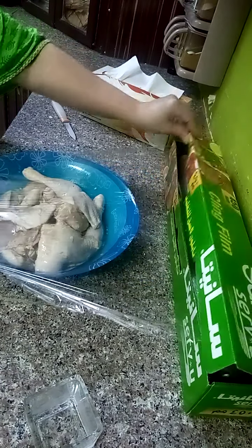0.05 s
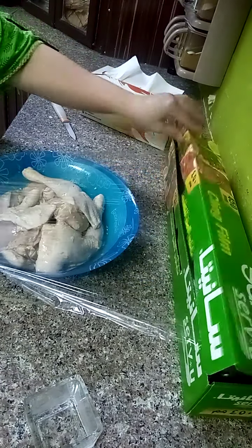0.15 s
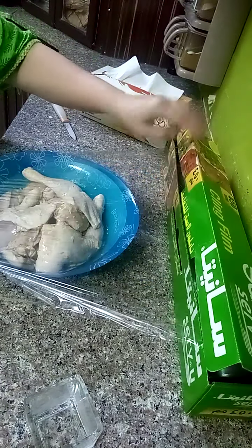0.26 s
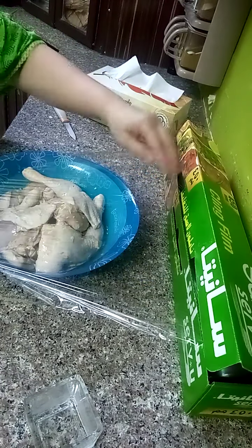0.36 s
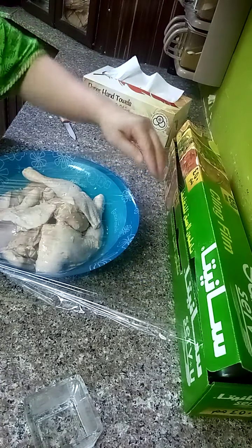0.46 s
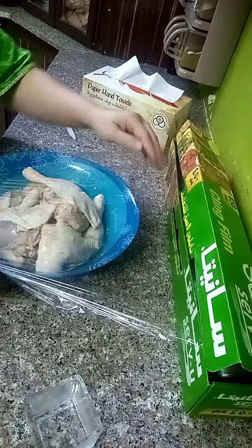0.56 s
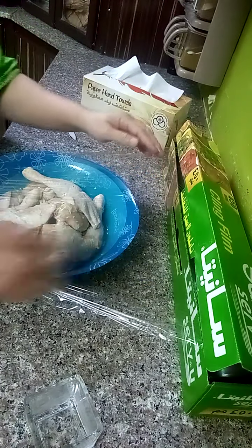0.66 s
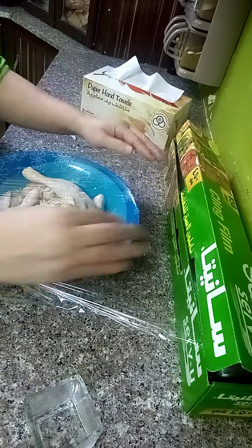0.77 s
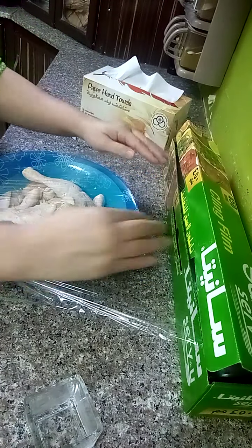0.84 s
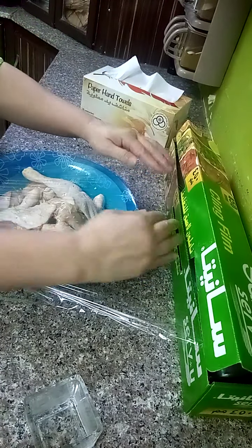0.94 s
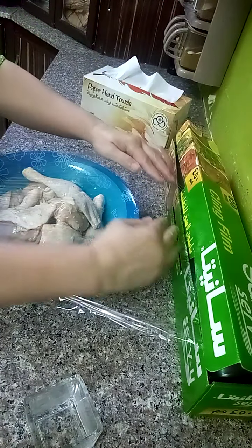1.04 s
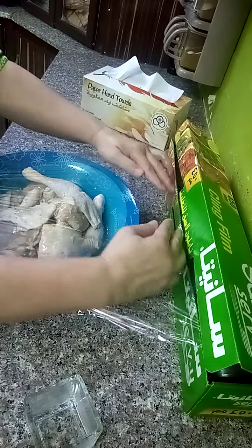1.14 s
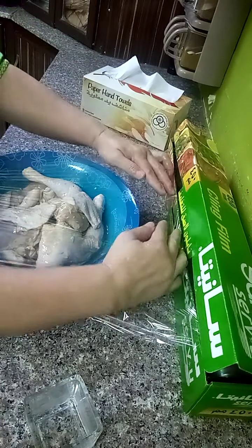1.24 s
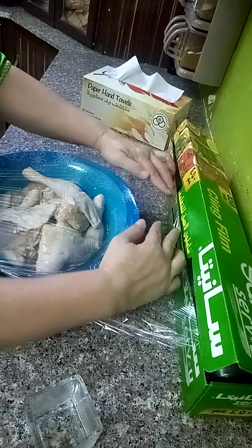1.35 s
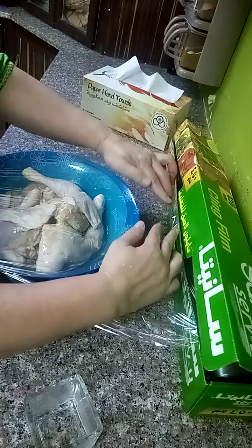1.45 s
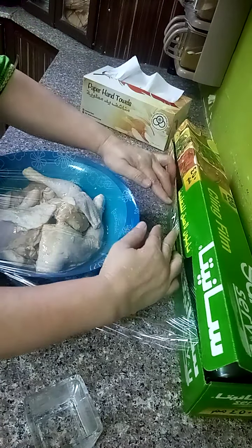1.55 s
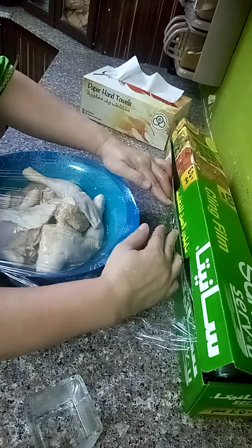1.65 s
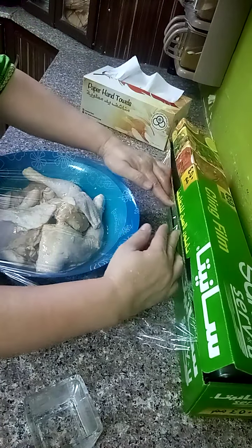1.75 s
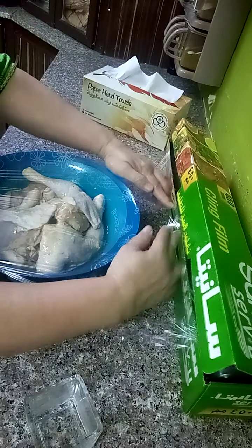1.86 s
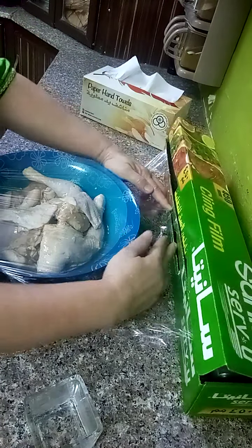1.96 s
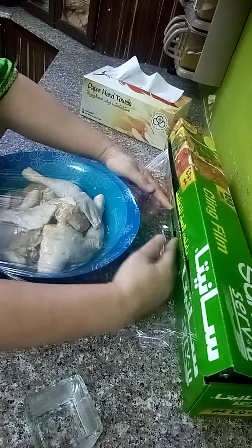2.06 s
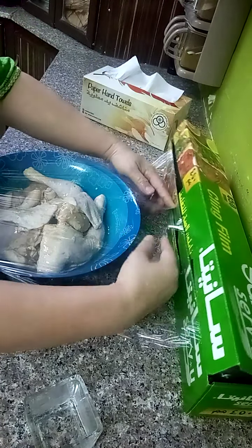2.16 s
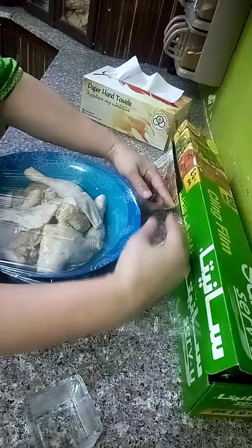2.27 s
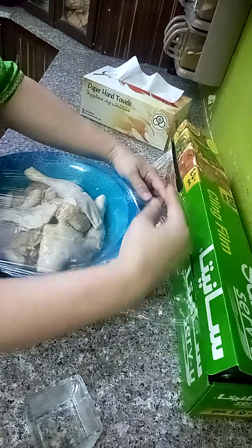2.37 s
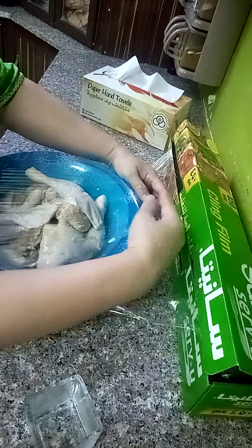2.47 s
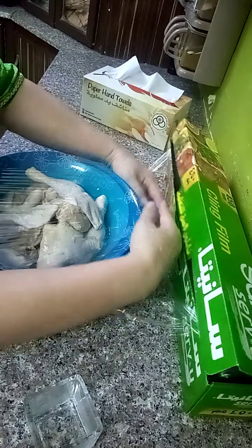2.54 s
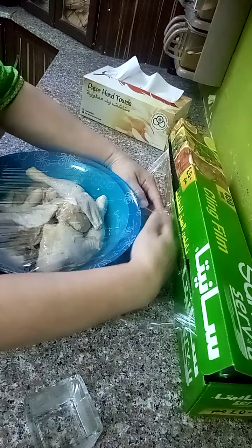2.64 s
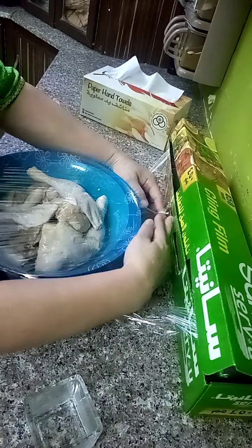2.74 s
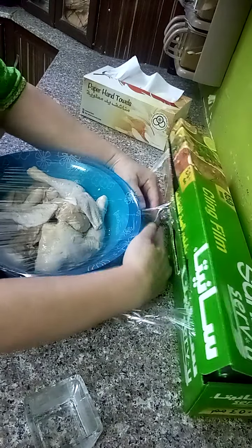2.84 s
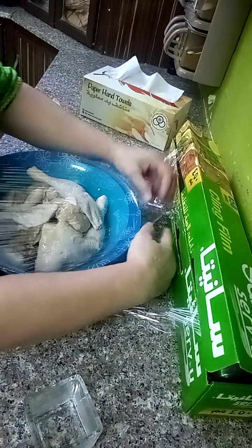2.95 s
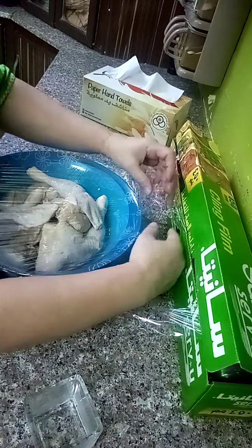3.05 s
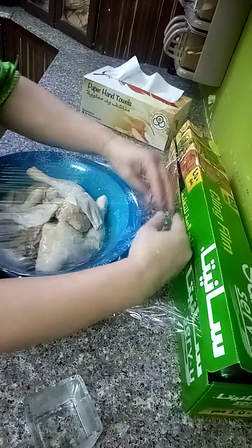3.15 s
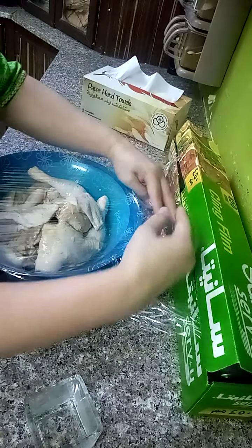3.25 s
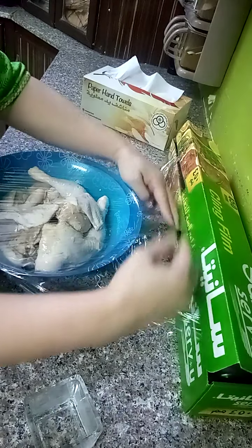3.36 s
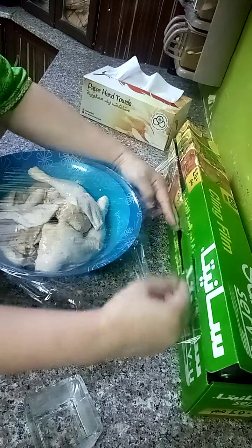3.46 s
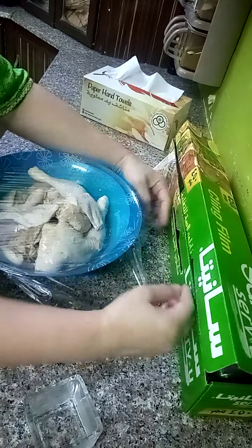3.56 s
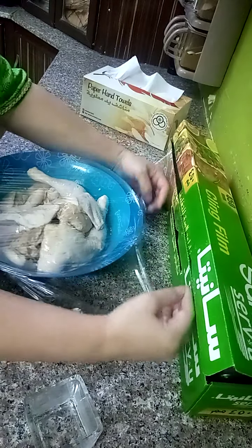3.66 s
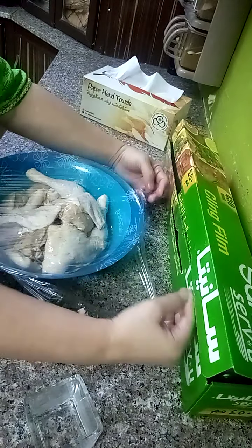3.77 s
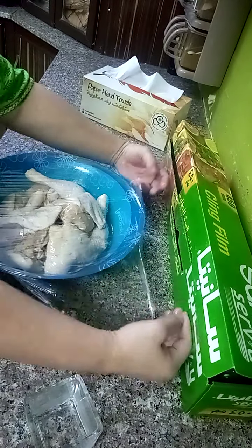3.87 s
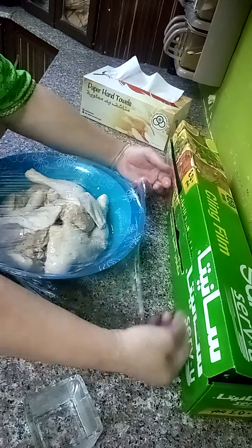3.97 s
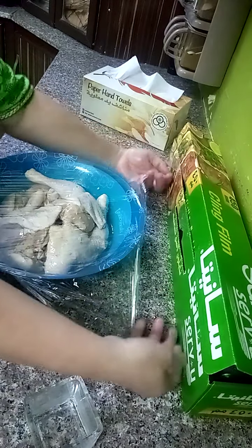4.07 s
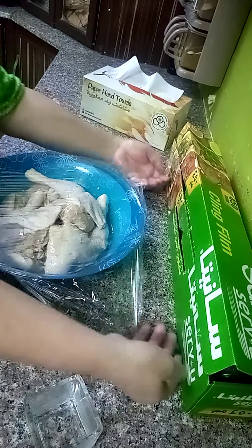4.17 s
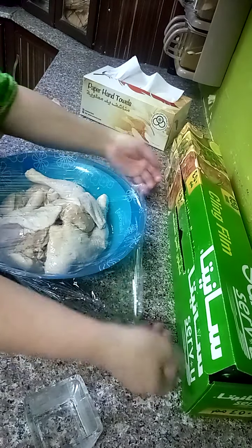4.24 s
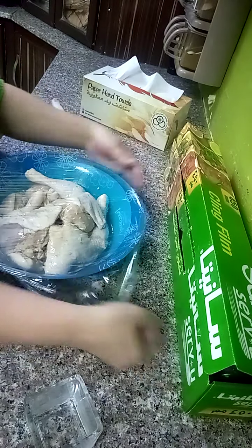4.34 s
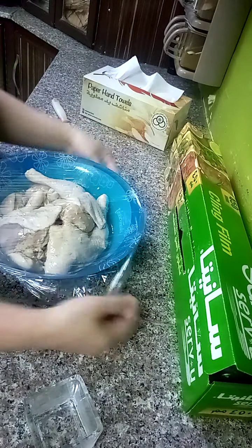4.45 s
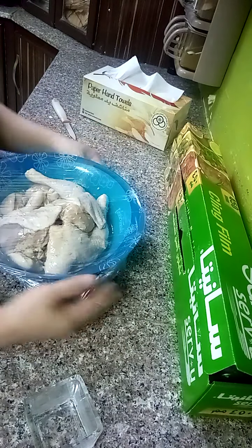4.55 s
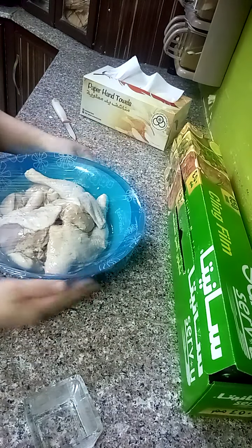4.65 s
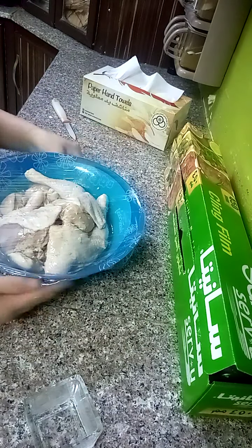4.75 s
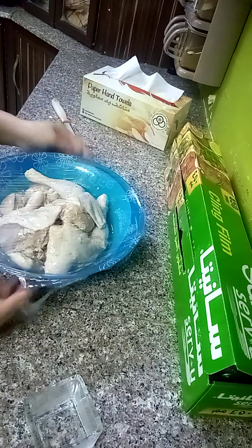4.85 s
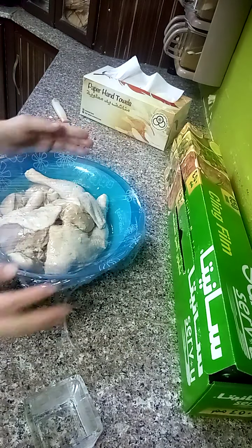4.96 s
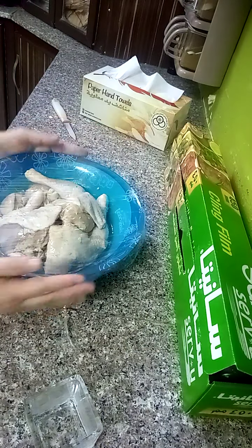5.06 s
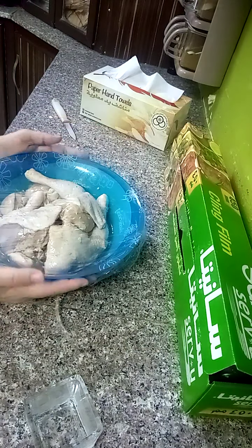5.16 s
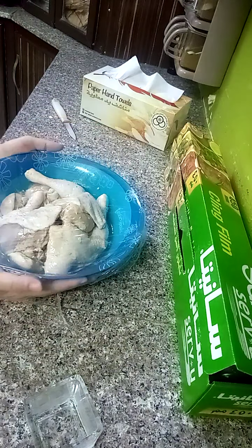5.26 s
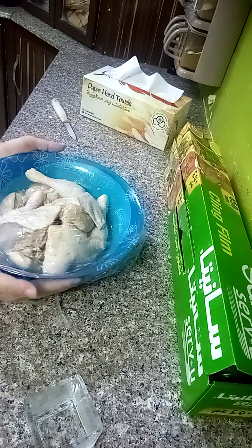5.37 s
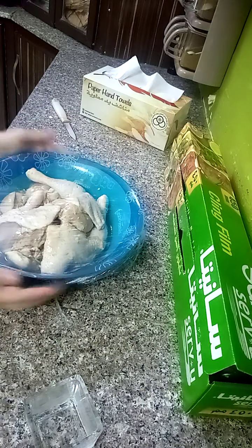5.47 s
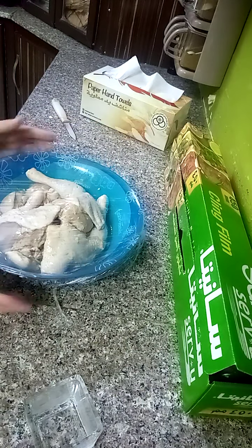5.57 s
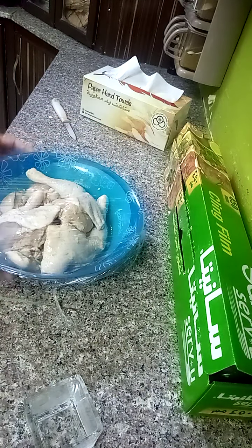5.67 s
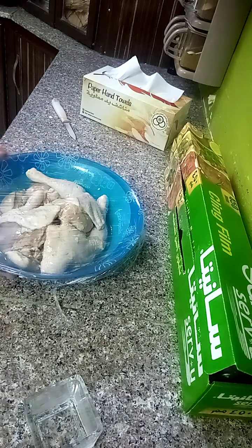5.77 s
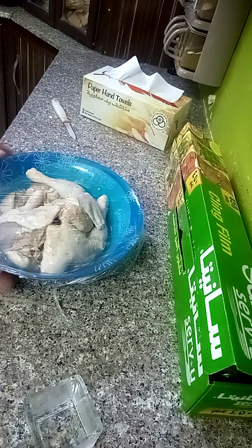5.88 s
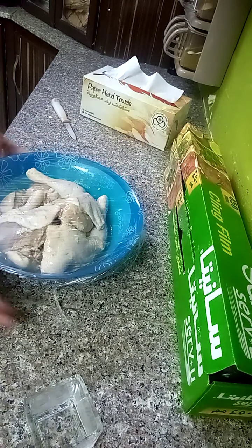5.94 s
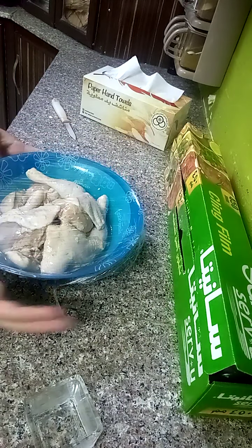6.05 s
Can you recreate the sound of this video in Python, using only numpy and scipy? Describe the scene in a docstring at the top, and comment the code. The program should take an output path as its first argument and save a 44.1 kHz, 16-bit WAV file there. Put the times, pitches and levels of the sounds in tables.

```python
"""A kitchen counter: cling film is pulled from its box, stretched over a plastic bowl and pressed down.
Loose film crinkles in countless tiny clicks; taut film drums as coloured noise and clicks, squeaks in
gliding harmonics and peels off in quick slips that ring like a plucked sheet. Hands bump the bowl and box
in low, decaying tones. Scattered echoes and a ringing tail make the hard kitchen; shaped noise and
sines make its air and faint appliance hum, all picked up by a phone's two microphones."""
import sys
import numpy as np
from scipy import signal
from scipy.fft import rfft, irfft, next_fast_len
from scipy.io import wavfile
from scipy.ndimage import uniform_filter1d, map_coordinates

SR = 44100
rng = np.random.default_rng(int(sys.argv[2]) if len(sys.argv) > 2 else 0)


def log_audio(samples):
    """Write samples as a 16-bit WAV file to the path given in sys.argv[1]."""
    # one column per channel
    frames = np.atleast_2d(samples).T
    # limit to full scale, then quantise
    limited = np.clip(frames, -1, 1)
    pcm = np.round(limited * 32767).astype(np.int16)
    wavfile.write(sys.argv[1], SR, pcm)


N = 269451  # length in samples
TOP_HZ = 15700  # upper edge of the band


def amp(db):
    """Decibels to gain."""
    return 10 ** (np.asarray(db) / 20)


def unit(x):
    """Scale to rms 1."""
    return x / np.sqrt(np.mean(x ** 2) + 1e-20)


def along(points, hz):
    """Read (f/Hz, value) points on a log frequency axis."""
    f, v = np.transpose(points)
    return np.interp(np.log(hz + 1), np.log(f + 1), v)


def seconds(length):
    """A time axis of the given length in seconds."""
    return np.arange(int(length * SR)) / SR


def add(track, s, sound):
    """Mix a sound into a track at time s."""
    part = track[max(round(s * SR), 0):][:len(sound)]
    part += sound[:len(part)]


def wobble(rate, size=N):
    """A random curve of straight segments, rate knots a second."""
    knots = rng.standard_normal(size // 8 + 4)
    return map_coordinates(knots, [np.arange(size) * rate / SR], order=1)


def filtered(x, response):
    """Multiply the spectrum of x by a response of frequency."""
    n = x.shape[-1]
    m = next_fast_len(n + 8192)
    hz = np.fft.rfftfreq(m, 1 / SR)
    return irfft(rfft(x, m) * response(hz), m)[..., :n]


def coloured(x, spectrum):
    """Shape x with a spectrum, at rms 1."""
    return unit(filtered(x, lambda hz: amp(along(spectrum, hz))))


def buckles(spectrum, rate, spread_db, clump_db, facet_db):
    """Tiny clicks of uneven size that come in clumps; each patch of film favours its own pitches."""
    happens = rng.random(N) < rate / SR
    sign = rng.choice([-1, 1], N)
    size = amp(spread_db * np.clip(rng.standard_normal(N), -2, 2))
    clicks = happens * sign * size * amp(clump_db * wobble(170))
    z = signal.stft(clicks, nperseg=128)[2]
    # random gains, smoothed over pitch and then over time
    facets = uniform_filter1d(rng.standard_normal(z.shape), 3, 0)
    facets = unit(uniform_filter1d(facets, 8, 1))
    return coloured(signal.istft(z * amp(facet_db * facets), nperseg=128)[1][:N], spectrum)


# colour of loose film: f/Hz, relative level/dB
CRINKLE = [(100, -90), (600, -1.5), (1500, -3.5), (2500, -1), (4000, 1.5), (6000, 4), (9000, 1.5),
           (11500, -10), (16000, -17)]
# colour of taut film drumming: f/Hz, relative level/dB
TAUT = [(40, -35), (120, -0.5), (200, -2.5), (370, 4), (640, 3.5), (1000, -3), (1400, -4.5), (2000, -8),
        (2800, -2.5), (6000, -47), (12000, -66)]
# tugs that stretch the film over the bowl:
# start t/s, length t/s, relative crinkle level/dB, relative drumming level/dB, crinkle tilt/(dB per octave)
TUGS = [(0, 0.039, -47.5, -48.5, -6), (0.993, 0.037, -57, -49, 0), (1.019, 0.086, -39, -45, -5),
        (1.198, 0.22, -41.5, -47, 6.5), (1.355, 0.043, -45, -44.5, -17), (1.492, 0.025, -45.5, -49, 1),
        (1.629, 0.05, -32, -36, -4.5), (1.728, .094, -33.5, -33, 0), (1.927, 0.024, -41.5, -46.5, -2),
        (2.062, .06, -47, -61, -1.5), (2.259, 0.047, -39, -49.5, 3.5), (2.398, .06, -37, -41.5, 2),
        (2.499, 0.08, -36.5, -33, 1), (2.651, 0.098, -35.5, -35.5, -5.5), (2.957, 0.031, -49, -44.5, 1.5),
        (3.035, 0.046, -35.5, -43, -3), (3.153, 0.038, -33.5, -38.5, -1), (3.218, 0.081, -53, -36.5, -1),
        (3.329, 0.027, -35, -44, 4.5), (3.414, 0.067, -33, -38.5, -0.5), (3.547, 0.076, -44.5, -37, 5),
        (3.678, 0.08, -38.5, -35.5, -0.5), (3.883, 0.054, -34, -26, -4.5)]
# palms smoothing the slack film round the rim: start t/s, length t/s, relative crinkle level/dB
RUBS = [(0.239, 0.077, -57.5), (4.35, 0.027, -36.5), (4.505, 0.13, -35), (4.961, .032, -39),
        (5.075, 0.074, -39.5), (5.3, 0.043, -52.5), (5.533, 0.16, -45.5), (5.764, 0.028, -51),
        (6.051, 0.094, -47.5)]
# folded under the rim, the film drums less and crinkles brighter:
# t/s, drumming relative to crinkle level/dB, crinkle tilt/(dB per octave)
SLACK = [(4.55, -11.5, 0.5), (4.95, -24, 3.5)]


def strokes(level_db=-0.85, tug_hz=1295, rub_hz=2100):
    """Moving film buckles all over; where it is taut, the buckles drum on the sheet."""
    loose = buckles(CRINKLE, rate=2200, spread_db=4.5, clump_db=3.0, facet_db=-1.0)
    taut = buckles(TAUT, rate=2500, spread_db=3, clump_db=2, facet_db=2.5)
    out = np.zeros(N)
    # tugs drum on a wide taut sheet
    for s, length, crinkle_db, drum_db, tilt_db in TUGS:
        add(out, s, stroke(loose, taut, s, length, crinkle_db, drum_db, tilt_db, tug_hz))
    # rubs drum higher, on a narrow strip at the rim
    times, drumming, tilts = np.transpose(SLACK)
    for s, length, db in RUBS:
        drum_db = db + np.interp(s, times, drumming)
        tilt_db = np.interp(s, times, tilts)
        add(out, s, stroke(loose, taut, s, length, db, drum_db, tilt_db, rub_hz))
    return amp(level_db) * out


def stroke(loose, taut, s, length, crinkle_db, drum_db, tilt_db, drum_hz,
           width_octaves=1.06, focus_db=10, knee_hz=1500,
           attack_share=0.12, release_s=.012, settle_db=-9.5, settle_s=0.051):
    """One move of the hand: attack, hold, release and settling shape both the crinkle and the drumming."""
    def tilt(hz):
        return amp(tilt_db * np.log2(np.maximum(hz, knee_hz) / knee_hz))

    def focus(hz):
        octaves = np.log2((hz + 1) / drum_hz)
        return amp(focus_db * np.exp(-.5 * (octaves / width_octaves) ** 2))

    span = slice(max(round(s * SR), 0), round((s + length + .25) * SR))
    crinkle = unit(filtered(loose[span], tilt))
    drum = unit(filtered(taut[span], focus))
    t = np.arange(len(drum)) / SR
    after = np.maximum(t - length, 0)
    attack = (1 - np.exp(-t / (attack_share * length))) ** 2
    release = np.exp(-after / release_s)
    settling = amp(settle_db) * np.exp(-after / settle_s)  # the film goes on creeping for a moment
    motion = attack * np.maximum(release, settling)
    return motion * (amp(crinkle_db) * crinkle + amp(drum_db) * drum)


# creases snapping through: t/s, relative crackle level/dB, drumming relative to first level column/dB
SNAPS = [(.078, -30.5, -22), (0.9832, -35.5, 7.5), (1.176, -23.5, 7), (1.2277, -22, 1), (1.285, -32, -18),
         (1.323, -8, -5.5), (1.3659, -8.5, -35), (1.4656, -22, -25), (1.599, -26.5, -4),
         (1.9482, -19.5, -22), (2.016, -26, 4), (2.3405, -30, -6), (2.3847, -22.5, -6), (2.44, -10.5, -4),
         (2.4997, -15.5, -0.5), (2.5482, -9, -13), (2.7183, -6, -9), (3.1748, -11.5, 0), (3.279, -8.5, -14),
         (3.354, -19, -10), (3.5457, -12.5, -12), (3.6062, -18, -3), (3.7504, -16, -9),
         (3.9307, -11.5, -15), (4.437, -19.5, -1.5), (4.7863, -31.5, -2), (4.9773, -30, -25)]


def snaps(t60=0.019, rise=.003):
    """A crease gives way in a short avalanche of buckles."""
    t = seconds(0.026)
    burst = (1 - np.exp(-t / rise)) ** 2 * amp(-60 * t / t60)
    crackle = buckles(CRINKLE, rate=6000, spread_db=3, clump_db=0, facet_db=2.5)
    drum = coloured(rng.standard_normal(N), TAUT)
    out = np.zeros(N)
    for s, db, drum_db in SNAPS:
        span = slice(round(s * SR), round(s * SR) + len(t))
        crack = amp(db - 23.0) * unit(burst * crackle[span])
        thump = amp(db + drum_db - 30.0) * unit(burst * drum[span])
        add(out, s - rise, crack + thump)
    return out


# film peeling in slips: start t/s, length t/s, first slip rate/(1/s), central ring f/Hz,
# relative ring level/dB, relative crack level/dB, swell over the peel/dB
PEELS = [(1.033, 0.082, 242, 1380, -38, -39, 3), (1.614, 0.059, 119, 1170, -37, -21.5, -2),
         (1.731, 0.061, 68, 1160, -22, -23.5, -7.5), (2.664, 0.055, 160, 1140, -33, -28.5, 4),
         (3.422, .016, 160, 983, -22.5, -51, -6), (3.683, 0.069, 88, 997, -23, -32.5, 1.5),
         (3.869, 0.064, 163, 1427, -15.5, -29, -2)]
# modes of the taut sheet: multiple of the ring pitch, relative level/dB
SHEET = [(.66, -1), (1, 2.5), (1.25, -9.5), (1.6, -11.5)]


def peels(ring_t60=0.015, crack_t60=0.019, jitter=.06, scatter=0.026, hiss_db=-10, radiate_hz=250,
          speedup=1.4):
    """Clinging film sticks and slips; every slip cracks and plucks the taut sheet."""
    t = seconds(.03)
    rings, plucks, cracks = np.zeros((3, N))
    for start, length, first_rate, ring_hz, ring_db, crack_db, swell_db in PEELS:
        s = 0
        for gap, size, pitch in rng.standard_normal((24, 3)):
            if s > length:
                break
            gain = amp(swell_db * s / length + 1.5 * size)
            pluck = gain * amp(ring_db - 60 * t / ring_t60)
            phase = 2 * np.pi * ring_hz * np.exp(scatter * pitch) * t
            modes = sum((-1) ** k * amp(db) * np.sin(ratio * phase) for k, (ratio, db) in enumerate(SHEET))
            add(rings, start + s, pluck * modes)
            add(plucks, start + s, pluck)
            add(cracks, start + s, gain * amp(crack_db - 60 * t / crack_t60))
            rate = first_rate * speedup ** (s / length)  # slips quicken through the peel
            s += np.exp(jitter * gap) / rate
    # wrinkles blur the sheet's modes
    wrinkles = amp(hiss_db) * plucks * coloured(rng.standard_normal(N), TAUT)
    # a small sheet radiates little bass
    sheet = filtered(rings + wrinkles, lambda hz: hz / np.hypot(hz, radiate_hz))
    return sheet + cracks * coloured(rng.standard_normal(N), CRINKLE)


# fingers squeaking on film: t/s, length t/s, first f/Hz, last f/Hz, relative level/dB
SQUEAKS = [(1.868, 0.0069, 1977, 2520, -32), (2.073, 0.014, 1900, 2030, -39),
           (3.17, 0.035, 2980, 3620, -29.5), (5.336, 0.027, 7430, 10800, -43.5),
           (5.601, 0.013, 1900, 1620, -39.5)]


def squeaks(second_db=0, third_db=-4):
    """Slips fast enough to make a pitch, which bends as the finger lets go."""
    out = np.zeros(N)
    loudest_db = max(row[-1] for row in SQUEAKS)
    for s, length, first_hz, last_hz, db in SQUEAKS:
        u = seconds(length) / length
        glide = first_hz + (last_hz - first_hz) * u ** 3
        hz = glide * (1 + .025 * wobble(900)[:len(u)])
        phase = 2 * np.pi * np.cumsum(hz) / SR
        pressure = amp(db - loudest_db)  # harder pressure gives stronger overtones
        tone = np.zeros(len(u))
        for k, level in enumerate([0, second_db, third_db], 1):
            in_band = k * hz < TOP_HZ
            tone += amp(level) * pressure ** (k - 1) * in_band * np.sin(k * phase)
        grip = amp(4.1 * wobble(740)[:len(u)] - 4.0)  # the finger grips unevenly
        swell = np.sqrt(np.abs(np.sin(np.pi * u)))
        add(out, s, amp(db) * grip * swell * tone)
    return out


# hands bumping bowl and box: t/s, relative level/dB, main ring f/Hz
BUMPS = [(1.327, -37, 260), (1.759, -34, 178), (2.561, -26, 341), (2.826, -18.5, 355.4), (2.851, -37, 109),
         (3.254, -25, 338), (3.288, -32, 187), (3.44, -33.5, 218), (3.706, -25, 229), (3.738, -15, 335),
         (3.919, -35, 168), (3.953, -39, 100)]


def bumps(rise=0.0058, thud_db=-7, cycles=32.6):
    """A soft contact rings one low mode over a dull thud, falling 60 dB in a set number of cycles."""
    t = seconds(.4)
    rings, thuds = np.zeros((2, N))
    for s, db, hz in BUMPS:
        blow = amp(db - 60 * t * hz / cycles) * (1 - np.exp(-t / rise))
        add(rings, s, blow * np.sin(2 * np.pi * hz * t))
        add(thuds, s, blow)
    dull = [(30, -63), (100, 12.0), (220, 15.5), (400, 23.5), (700, 12), (3000, -58)]  # f/Hz, level/dB
    return rings + amp(thud_db) * thuds * coloured(rng.standard_normal(N), dull)


# ringing of the room: f/Hz, time to fall 60 dB t/s
ROOM = [(100, 0.93), (500, 0.32), (1500, 0.46), (5000, 0.47), (10000, 0.38), (16000, 0.51)]


def kitchen(x, early_db, tail_db, lag=0.0009873):
    """The direct sound reaches the left microphone first; near surfaces scatter it, then the room rings."""
    direct = np.array([x, np.roll(x, round(lag * SR))])
    near = direct + amp(early_db) * bounces(x)
    hz, t, z = signal.stft(rng.standard_normal((2, SR // 2)), SR, nperseg=256)
    decay = amp(-60 * t / along(ROOM, hz)[:, None])
    tail = signal.istft(z * (1 - np.exp(-t / 0.018)) * decay, SR, nperseg=256)[1]
    tail = tail / np.linalg.norm(tail[0])
    return near + amp(tail_db) * signal.fftconvolve(near, tail, axes=1)[:, :N]


def bounces(x, t60=0.042, size=2048):
    """Sparse echoes off counter, box and wall, redrawn for each overlapping slice of the sound."""
    t = seconds(.035)
    fade, padded = signal.windows.cosine(size), np.pad(x, size)
    out = np.zeros((2, len(padded)))
    for i in range(size // 2, N + size, size // 2):
        echoes = rng.standard_normal((2, len(t))) * (rng.random((2, len(t))) < .08)
        echoes = echoes * (t > .001) * amp(-60 * t / t60)
        echoes = echoes / np.linalg.norm(echoes, axis=1, keepdims=True)
        piece = padded[i:i + size] * fade
        for track, sound in zip(out, signal.fftconvolve([piece], echoes, axes=1)):
            add(track, i / SR, sound)
    return out[:, size:size + N]


# colour of the room air: f/Hz, relative level/dB
AMBIENCE = [(20, -17), (45, -13), (78, -11), (105, -2.5), (160, -1.5), (300, -16.5), (480, -10.5),
            (750, -11.5), (1200, -13), (2200, -22.5), (5400, -24), (6500, -18.5), (9000, -26.5),
            (12500, -44.5)]
# appliance hum: f/Hz, rms level before wobble and microphones/dB
HUM = [(140.0, -65), (279.9, -67), (349.9, -73), (656.8, -74)]


def background(level_db=-55, mono_hz=1300):
    """Room air, alike at both microphones in the bass, and a slightly unsteady hum."""
    mid, side = rng.standard_normal((2, N))
    side = filtered(side, lambda hz: hz / np.hypot(hz, mono_hz))
    air = amp(level_db) * coloured(np.array([mid + side, mid - side]), AMBIENCE)
    t = np.arange(N) / SR
    hum = np.zeros(N)
    for hz, db in HUM:
        level = np.sqrt(2) * amp(db + 0.5 * wobble(3.76))
        hum += level * np.sin(2 * np.pi * hz * t + 0.13 * wobble(4.16))
    return air + hum


def scene():
    """Film and bowl on the counter, in the kitchen."""
    film = kitchen(strokes() + snaps() + squeaks(), early_db=4, tail_db=-5.5)
    peeling = kitchen(peels(), early_db=4, tail_db=-9.5)
    knocks = kitchen(bumps(), early_db=-20, tail_db=-17.5)
    return amp(-3) * film + amp(-5.5) * peeling + knocks + background()


# balance of the microphones: f/Hz, left minus right level/dB
BALANCE_LR = [(100, -5.5), (400, -5), (700, -3.5), (1500, -3), (4400, -2), (9000, -8), (11000, -11.5),
              (15000, -25.5)]
# peaks and dips of the microphone ports: f/Hz, width f/Hz, level/dB
PORTS = [(502.5, 62, -9.5), (6440, 216, 3), (15060, 510, 13)]


def record(dry, low_cut_hz=65):
    """The ports colour the sound, the left microphone is weaker and duller, and the band ends steeply."""
    def response(hz):
        ratio = amp(along(BALANCE_LR, hz))
        balance = np.array([ratio, np.ones_like(ratio)]) * 2 / (1 + ratio)
        ports = amp(sum(db * np.exp(-.5 * ((hz - centre) / width) ** 2) for centre, width, db in PORTS))
        low_cut = hz ** 2 / np.hypot(hz ** 2, low_cut_hz ** 2)
        return low_cut * ports * balance
    heard = filtered(dry, response)
    return filtered(heard, lambda hz: 1 / np.sqrt(1 + (hz / TOP_HZ) ** 160))


dry = scene()
out = record(dry)
log_audio(out)
```